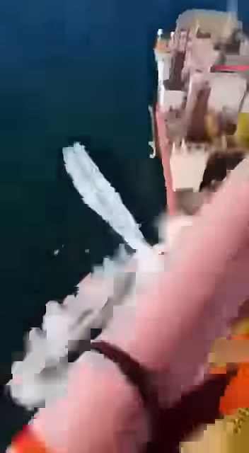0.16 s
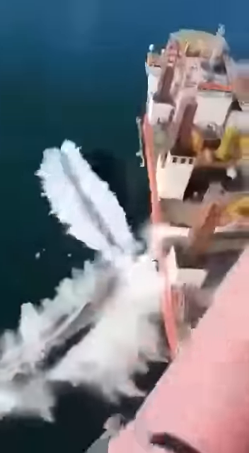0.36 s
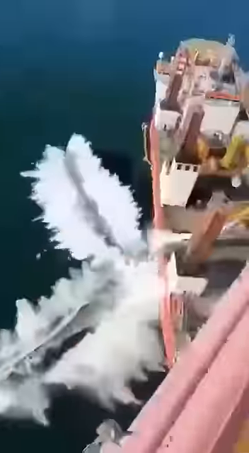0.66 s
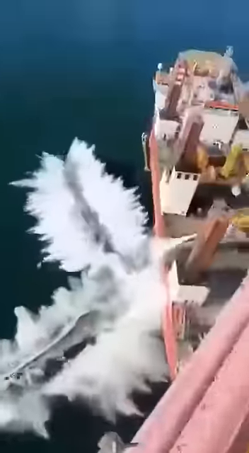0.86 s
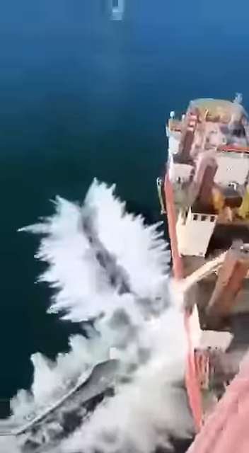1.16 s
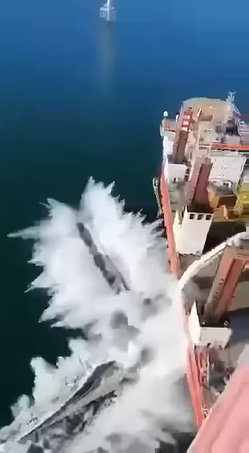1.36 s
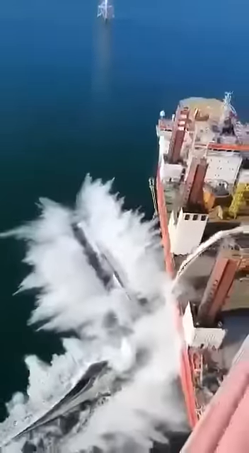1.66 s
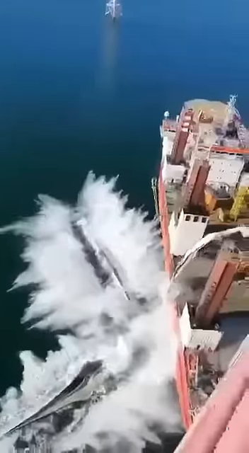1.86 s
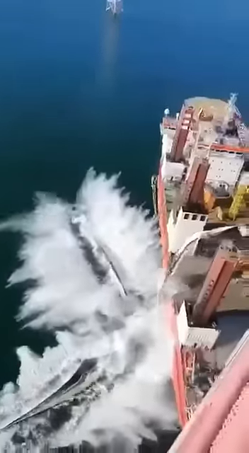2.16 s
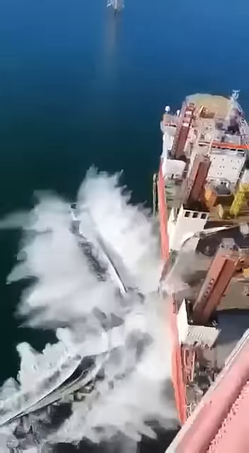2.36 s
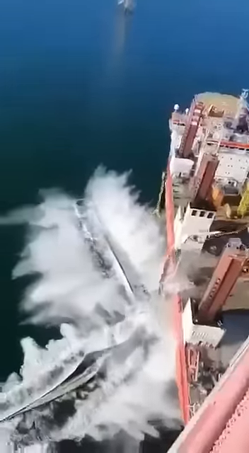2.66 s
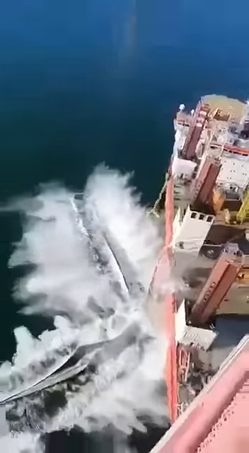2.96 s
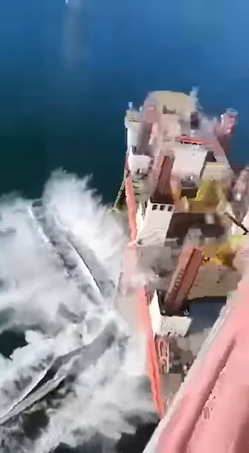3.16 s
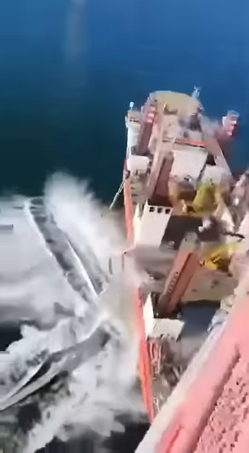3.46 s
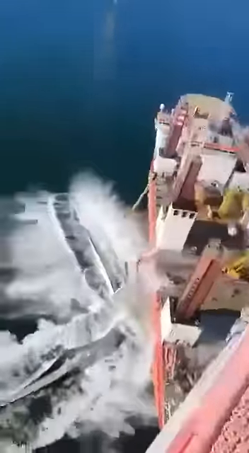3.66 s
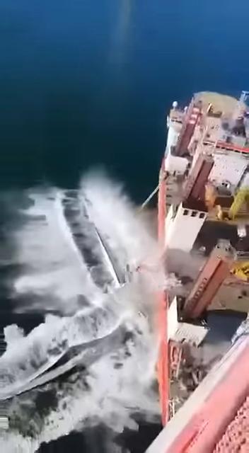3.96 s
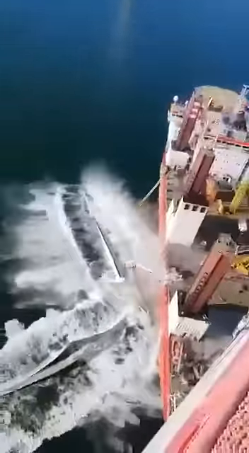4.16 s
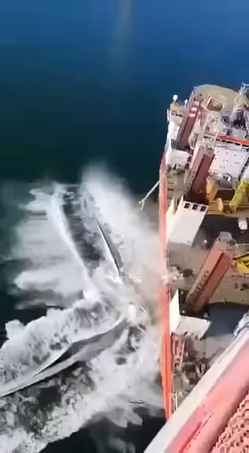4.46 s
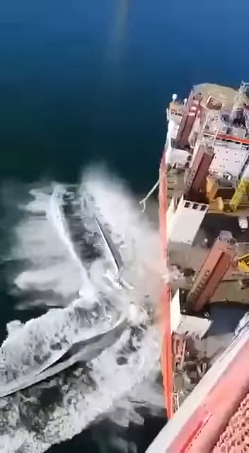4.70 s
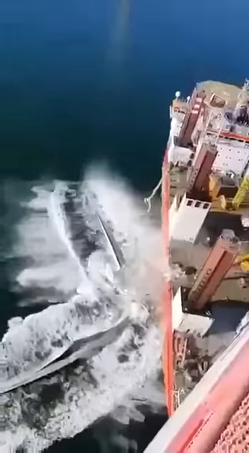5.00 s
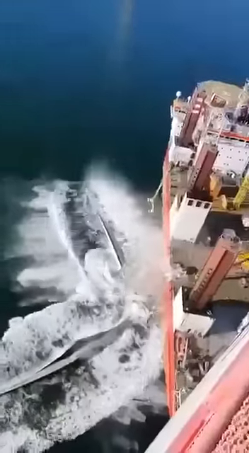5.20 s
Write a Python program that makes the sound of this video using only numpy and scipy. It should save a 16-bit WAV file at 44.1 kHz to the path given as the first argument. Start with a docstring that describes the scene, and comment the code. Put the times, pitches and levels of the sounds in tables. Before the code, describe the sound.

Beside a ship, a huge splash subsides, then falling water swells into a rough, crackling roar while gusts thump the microphone.

```python
"""A rush of thrown water over a low boom fades first: a huge object has crashed into the sea beside a ship.
Heard from a high, windy deck, it swells into a churning roar as the spray comes down,
with crackling drops, thuds and sharp slaps. Gusts buffet the microphone: a rumble, low thumps and a rasp.
Water and wind are coloured noise that follows one curve of force; slaps, thuds, gushes and buffets
are short bursts or swings placed one by one."""
import sys
import numpy as np
from scipy import signal
from scipy.fft import rfft, irfft
from scipy.io import wavfile
from scipy.ndimage import uniform_filter1d, minimum_filter1d

SR = 44100
rng = np.random.default_rng(int(sys.argv[2]) if len(sys.argv) > 2 else 0)


def digitize_waveform(pressure):
    """Quantize a signal to 16-bit integers and store it at the path in sys.argv[1].

    Rows of a 2-D input are taken as channels; values are limited to [-1, 1].
    """
    field = np.atleast_2d(pressure).T
    bounded = np.clip(field, -1, 1)
    quanta = np.round(bounded * 32767).astype(np.int16)
    wavfile.write(sys.argv[1], SR, quanta)


N = 235168
TIME = np.arange(N) / SR


def from_db(db):
    """Decibels to gain."""
    return 10 ** (np.asarray(db) / 20)


def unit(x):
    """Scales to rms 1."""
    return x / np.sqrt(np.mean(x ** 2) + 1e-20)


def at_hz(points, hz):
    """Reads a table on a log-frequency axis."""
    f, value = np.transpose(points)
    return np.interp(np.log(hz + 1), np.log(f + 1), value)


def level(rows):
    """A curve in dB as a gain for every sample."""
    s, db = np.transpose(rows)
    return from_db(np.interp(TIME, s, db))


def add(mix, start_s, sound):
    """Mixes a sound in at its start time."""
    part = mix[:, max(round(start_s * SR), 0):][:, :sound.shape[-1]]
    part += sound[..., :part.shape[-1]]


def noise():
    """Two independent white noises."""
    return rng.standard_normal((2, N))


def grains(per_s, spread_db):
    """Dense random impulses, most small and a few large."""
    size = from_db(spread_db * np.minimum(rng.exponential(1, N), 4))
    struck = rng.random(N) < per_s / SR
    return unit(noise() * size * struck)


def eddies(rate_hz):
    """A random wobble of rms 1, with changes up to about the given rate."""
    hz = np.fft.rfftfreq(N, 1 / SR)
    shape = hz / (hz + 10) / (1 + (hz / rate_hz) ** 2)
    return unit(irfft(rfft(rng.standard_normal(N)) * shape, N))


# Stereo likeness by pitch, bass nearly mono, treble wide and partly opposed in phase:
# pitch_hz, likeness (1 same, 0 unrelated, -1 opposed)
STEREO_LIKENESS = [(80, .995), (400, .99), (600, .98), (1000, .95), (1600, .93), (2050, .95), (2450, .78),
                   (2850, .2), (3300, -.75), (3700, -.7), (4500, -.1), (8000, -.25)]
# Tilt between left and right: pitch_hz, left_over_right_db
STEREO_BALANCE = [(60, 0.26), (300, 0.4), (1500, 0.76), (5000, 0.5)]
# Phase between left and right: pitch_hz, left_lead_rad
STEREO_LEAD = [(100, 0), (400, .04), (1200, .15), (2300, .3), (3000, .7), (4500, .26)]


def colour(pair, spectrum):
    """Gives two noises a spectrum and a stereo image: bass nearly mono, treble wide and partly opposed."""
    hz = np.fft.rfftfreq(N, 1 / SR)
    mid, side = rfft(pair)
    same = np.clip(at_hz(STEREO_LIKENESS, hz), -.995, .995)
    mid = mid * np.sqrt(1 + same)
    side = side * np.sqrt(1 - same)
    # half of the tilt and phase goes to each channel
    offset = from_db(at_hz(STEREO_BALANCE, hz) / 2) * np.exp(.5j * at_hz(STEREO_LEAD, hz))
    stereo = np.array([(mid + side) * offset, (mid - side) / offset])
    return unit(irfft(stereo * from_db(at_hz(spectrum, hz)), N))


def steady(x, span_s):
    """Keeps a noise's grain but evens out its slow swells."""
    power = uniform_filter1d((x ** 2).mean(0), max(int(span_s * SR), 2))
    return x / np.sqrt(abs(power) + 1e-9)


def clumps(x, depth_db, width_hz, span_s):
    """Churning is uneven: patches of the spectrum swell and sink at random."""
    frame, hop = 1024, 256
    z = signal.stft(x, nperseg=frame, noverlap=frame - hop)[2]
    patch = rng.standard_normal(z.shape[1:])
    # smooth across pitch, then across time
    patch = signal.lfilter([1], [1, -np.exp(-SR / frame / width_hz)], patch, axis=0)
    patch = signal.lfilter([1], [1, -np.exp(-hop / SR / span_s)], patch, axis=1)
    uneven = z * from_db(depth_db * unit(patch))
    return signal.istft(uneven, nperseg=frame, noverlap=frame - hop)[1][:, :N]


def burst(t, centre_hz, octaves, apart, top_hz=3400):
    """A stretch of noise around one pitch, different between left and right by the given amount."""
    hz = np.fft.rfftfreq(len(t), 1 / SR)
    band = 1 / (1 + (np.log2((hz + 1) / centre_hz) / octaves) ** 2)
    band = band / (1 + (hz / top_hz) ** 10)
    mid, side = irfft(rfft(rng.standard_normal((2, len(t)))) * band, len(t))
    return steady(np.array([mid + apart * side, mid - apart * side]), span_s=0.0017)


# Force of the turbulence, sinking to a lull, then building as the water comes down: time_s, force_db
FORCE = [(0, -20), (.5, -18.5), (.61, -26.5), (1.1, -29.5), (1.62, -36.5), (2, -36), (2.65, -25),
         (2.87, -21.5), (3.15, -19.5), (3.26, -15.5), (3.7, -16), (3.82, -19.5), (4.1, -18), (4.25, -17),
         (4.62, -16), (4.76, -19.5), (5.2, -14.5), (5.33, -18)]
FULL_DB = -18  # the force at which a layer plays at its own gain_db


def follow(gain_db, slope):
    """A layer's gain: its level at full force, and the dB it moves for each dB of force."""
    return from_db(gain_db) * (level(FORCE) / from_db(FULL_DB)) ** slope


def swells(rows, order):
    """Each event lifts a layer by the dB in one column: attack, hold, release."""
    attack, release = 0.13, 0.78  # shares of the event's length
    lift = np.zeros(N)
    for row in rows:
        age = (TIME - row[0]) / row[1]
        ramps = np.minimum(age / attack, (1 - age) / release)
        lift += row[order] * np.clip(ramps, 0, 1)
    return from_db(lift)


def arrival(growth_db=10, onset_s=1.75, growth_s=1.52):
    """The gain of the layers that harden as the falling water arrives."""
    arrived = np.clip((TIME - onset_s) / growth_s, 0, 1)
    return from_db(growth_db * (arrived - 1))


# Tone of the roar: pitch_hz, level_db (per Hz)
ROAR_TONE = [(60, -18), (110, -19.5), (160, -1.5), (270, -0.5), (400, -1.5), (600, -8.5), (850, -10.5),
             (1200, -18), (1800, -23), (3000, -38), (4500, -101.5)]
# Surges of churning water, shared with rasp and spray: start_s, length_s, roar_db, rasp_db, spray_db (lifts)
CHURN_SURGES = [(.1, 0.45, -2.5, -2, -1), (.403, 0.048, 3, -3, 6), (1.39, 0.024, 3, 1, 0),
                (2.2, 1, -1, -1, 3), (2.7, 0.023, 1.5, 0, 5.5), (2.85, 0.18, 3, 10.5, 4.5),
                (2.96, 0.44, 0, -2, 7), (3.165, 0.09, 3.5, 2.5, 2), (3.48, 0.053, 1.5, 8.5, 0),
                (3.66, 0.12, 0, 6, 1.5), (3.95, 0.14, 4, 4, 4.5), (4.352, 0.082, 1.5, 1, -1.5),
                (4.515, 0.12, 2, 0.5, -4.5), (4.64, 0.081, 4, -2, -3), (4.835, 0.034, 5.5, -1, 6),
                (5.055, 0.092, 2, 1.5, 2), (5.21, 0.065, 2.5, -4, -7)]


def roar(flutter, flutter_db=0.5, gain_db=-18.0, slope=1.0):
    """Countless collapsing pockets of air and water, surging with the turbulence."""
    churn = colour(grains(per_s=5000, spread_db=1.5) * from_db(flutter_db * flutter), ROAR_TONE)
    churn = clumps(churn, depth_db=2.5, width_hz=42, span_s=0.042)
    return follow(gain_db, slope) * swells(CHURN_SURGES, order=2) * steady(churn, span_s=0.035)


def wash():
    """The water thrown out by the impact rushes away over a low boom; both fade steadily."""
    rush = from_db(-33.5 - 10 * TIME) * burst(TIME, centre_hz=746, octaves=0.23, apart=0.1)
    hz = np.fft.rfftfreq(N, 1 / SR)
    boom_band = np.exp(-np.log2((hz + 1) / 160) ** 2 / .5)  # centred on 160 Hz
    boom = unit(irfft(rfft(rng.standard_normal(N)) * boom_band, N))
    return rush + from_db(-24.5 - 12.5 * TIME) * boom  # fades in dB per second


# Slaps, and in the last row a tiny click of overload:
# start_s, level_db (of the crack's envelope peak), pitch_hz, tail_t60_s
SLAP_AND_CLICK_HITS = [(0.44, -19, 1700, .07), (0.968, -25, 1590, 0.052), (1.1348, -19, 1060, 0.083),
                       (2.032, -26, 2000, .04), (2.0408, -17, 2100, 0.11), (2.142, -30, 2900, 0.11),
                       (2.165, -41, 1700, .06), (2.228, -28, 1670, 0.09), (2.5388, -18, 2750, 0.23),
                       (2.742, -13.5, 2110, 0.17), (2.8584, -18, 2060, .04), (2.8766, -12, 2060, 0.1),
                       (2.8882, -15, 1820, 0.093), (2.9433, -7.5, 2200, 0.087), (2.948, -14, 1600, .07),
                       (3.1165, -15, 1590, .1), (3.174, -16, 1500, 0.065), (3.3183, -10, 1620, .05),
                       (3.373, -10, 1930, 0.088), (3.487, -16, 1490, 0.06), (3.571, -12, 2160, 0.18),
                       (3.719, -11, 1500, .05), (3.761, -8, 1500, 0.041), (3.8768, -11, 1520, 0.13),
                       (3.9966, -9, 1540, .04), (4.1287, -17, 1570, 0.037), (4.365, -12.5, 1680, 0.085),
                       (4.843, -13, 1500, .06), (5.002, -8, 1700, .05), (5.065, -15, 1820, 0.092),
                       (5.1351, -20, 1480, 0.054), (5.164, -18, 1580, .04)]


def slaps_and_click(tail_db=-15, body_db=-14, body_hz=950, body_t60_s=0.031):
    """A slap is a crack of two or three cycles, a dull smack and a short scatter; so is the last click."""
    out, t = np.zeros((2, N)), np.arange(SR // 4) / SR
    age = t / .00055  # the crack peaks about half a millisecond in
    for start_s, level_db, pitch_hz, t60_s in SLAP_AND_CLICK_HITS:
        crack = age ** 2 * np.exp(2 * (1 - age)) * np.sin(2 * np.pi * pitch_hz * t)
        tail = from_db(tail_db - 60 * t / t60_s) * burst(t, pitch_hz, octaves=0.66, apart=0.16)
        smack = from_db(body_db - 60 * t / body_t60_s) * burst(t, body_hz, octaves=0.45, apart=0.49)
        onset = 1 - np.exp(-age)
        add(out, start_s, from_db(level_db) * (crack + onset * (tail + smack)))
    return out


# Slabs of water landing flat: start_s, level_db (of the envelope peak), pitch_hz
THUD_HITS = [(0.419, -21, 615), (0.429, -7, 520), (0.439, -11, 535), (1.094, -19.5, 610),
             (1.402, -18.5, 380), (1.472, -39, 560), (1.933, -42, 600), (2.541, -19.5, 537),
             (3.76, -14, 595), (3.862, -5.5, 470), (3.976, -9.5, 480), (4.362, -2, 468), (4.526, -3, 720),
             (4.603, -7.5, 490)]


def thuds(rise_s=0.0016, scatter=0.076):
    """A slab of water lands flat: a few quick, ragged swings of pressure."""
    out, t = np.zeros((2, N)), np.arange(SR // 16) / SR
    for start_s, level_db, pitch_hz in THUD_HITS:
        swing = np.sin(2 * np.pi * pitch_hz * t)
        ragged = swing + scatter * burst(t, 2 * pitch_hz, octaves=0.13, apart=0.37)
        envelope = t / rise_s * np.exp(1 - t / rise_s)
        add(out, start_s, from_db(level_db) * envelope * ragged)
    return out


# Gushes of falling water: start_s, level_db (before gain_db), pitch_hz, length_s (decay scale)
GUSH_HITS = [(0.405, -18, 700, 0.049), (0.923, -29, 810, 0.06), (1.246, -33, 710, 0.072),
             (2.865, -19.5, 965, 0.17), (3.417, -23.5, 760, 0.27), (3.862, -9, 547, 0.032),
             (3.985, -17, 412, 0.12), (4.362, -9, 510, 0.037), (4.464, -16, 590, 0.055),
             (4.523, -11, 505, 0.029), (4.6, -14.5, 666, 0.067), (4.853, -17, 495, 0.034),
             (5.145, -13.5, 885, 0.037)]


def gushes(gain_db=-3, rise=0.18):
    """Sheets of water land: a quick swell of low noise that sinks away."""
    out, t = np.zeros((2, N)), np.arange(SR // 2) / SR
    for start_s, level_db, pitch_hz, length_s in GUSH_HITS:
        age = t / length_s
        swell = (1 - np.exp(-age / rise)) * np.exp(-age ** 2)
        sheet = burst(t, pitch_hz, octaves=0.33, apart=0.087)
        add(out, start_s, from_db(gain_db + level_db) * swell * sheet)
    return out


# Crackle of heavy drops: pitch_hz, level_db (per Hz)
SPATTER_TONE = [(600, -9), (1100, 9), (1600, -1), (1900, 3.5), (2300, 6.5), (3200, -28), (3800, -27.5),
                (5000, -33), (8000, -59.5)]


def spatter(gain_db=-32, slope=0.74):
    """Heavy drops crack on the surface, a few hundred a second, in uneven patches of colour."""
    hits = colour(grains(per_s=330, spread_db=1.2), SPATTER_TONE)
    hits = clumps(hits, depth_db=6, width_hz=370, span_s=.008)
    return follow(gain_db, slope) * arrival() * steady(hits, span_s=.04)


# Main curtain of spray: pitch_hz, level_db (per Hz)
PATTER_TONE = [(1200, -30), (2400, -7.5), (3200, 8), (3900, -28.5), (5500, -26.5), (7500, -26.5),
               (9200, -16.5), (11000, -37.5)]
# Open sea: pitch_hz, level_db (per Hz)
SEA_TONE = [(1200, -7.5), (2200, 2.5), (3400, -4), (4500, -8), (6000, -15.5), (7500, -22), (11000, -23.5)]


def patter(loudest_db=-33, loudest_s=3.43, rise_s=0.44, fall_s=0.044, sea_db=-56):
    """The curtain of spray comes down and thins out, over the faint hiss of the sea."""
    age = TIME - loudest_s
    fall = from_db(loudest_db) * np.exp(np.minimum(age / rise_s, -age / fall_s))
    drops = colour(grains(per_s=14000, spread_db=5.5), PATTER_TONE)
    return fall * drops + from_db(sea_db) * colour(noise(), SEA_TONE)


# Fans of fine mist: loudest_s, half_length_s, level_db
MIST_FANS = [(0.254, 0.21, -42), (5.076, 0.03, -35.5), (5.134, 0.077, -36)]
# Their hiss: pitch_hz, level_db (per Hz)
MIST_TONE = [(2500, -33), (4200, 11), (5300, -16.5), (6300, -15), (8000, -17.5), (11000, -22.5)]


def mist():
    """Fans of fine droplets fly up with a short, bright fizz."""
    swell = np.zeros(N)
    for loudest_s, half_length_s, level_db in MIST_FANS:
        swell += from_db(level_db) * np.exp(-((TIME - loudest_s) / half_length_s) ** 2)
    return swell * colour(grains(per_s=4000, spread_db=2.5), MIST_TONE)


# Fine far spray: pitch_hz, level_db (per Hz)
SPRAY_TONE = [(1000, -12), (2500, 4.5), (3300, 16), (3900, 6.5), (5000, 7.5), (6200, -2), (7700, -17.5),
              (9000, -18), (11000, -40)]


def spray(flutter, flutter_db=2.03, gain_db=-40, slope=0.91):
    """Far droplets rain back on the sea as a fine hiss that drifts on the wind."""
    drops = colour(grains(per_s=12000, spread_db=1.5) * from_db(flutter_db * flutter), SPRAY_TONE)
    drops = clumps(drops, depth_db=3.2, width_hz=200, span_s=.02)
    return follow(gain_db, slope) * swells(CHURN_SURGES, order=4) * steady(drops, span_s=0.73)


# Wind rasp: pitch_hz, level_db (per Hz)
RASP_TONE = [(500, -16), (900, -5.5), (1300, -2.5), (1620, 3.5), (1900, -12.5), (2350, -0.5), (2750, -8),
             (3200, -14), (3700, -43.5), (4500, -56), (8000, -78)]


def rasp(gain_db=-26, slope=0.8):
    """Small eddies tear at the microphone ports and ring them broadly."""
    tearing = colour(grains(per_s=3000, spread_db=1.0), RASP_TONE)
    tearing = clumps(tearing, depth_db=5.5, width_hz=110, span_s=0.02)
    tearing = steady(tearing, span_s=.025)
    return follow(gain_db, slope) * arrival() * swells(CHURN_SURGES, order=3) * tearing


# Hollow resonance of the ports: pitch_hz, level_db (per Hz)
HOLLOW_TONE = [(900, -5.5), (1270, -4), (1540, 13.5), (1720, 7), (1900, 5.5), (2250, 4), (2700, -54)]


def hollow(flutter, flutter_db=2, gain_db=-36, slope=1.6):
    """Wind drives one broad resonance of the ports, most of all in a squall blowing straight in."""
    rush = colour(noise() * from_db(flutter_db * flutter), HOLLOW_TONE)
    squall_s, half_length_s, lift_db = 5.076, 0.23, 14
    squall = from_db(lift_db * np.exp(-((TIME - squall_s) / half_length_s) ** 2))
    return follow(gain_db, slope) * squall * steady(rush, span_s=.03)


# Buffets: start_s, level_db (before gain_db), pitch_hz (before wander), length_s
BUFFET_HITS = [(0.404, -9.5, 249, 0.053), (0.417, -11, 87, 0.06), (2.712, -13, 228, 0.018),
               (2.938, -9, 346, 0.028), (3.175, -7.5, 241.5, 0.057), (3.289, -4.5, 91.6, 0.045),
               (5.041, -4.5, 76.6, 0.034), (5.221, -19, 262, 0.012)]


def buffets(gain_db=-2, wander=0.25):
    """Single strong eddies: a few uneven swings of pressure each."""
    out = np.zeros((2, N))
    for start_s, level_db, pitch_hz, length_s in BUFFET_HITS:
        hz = pitch_hz * (1 + wander * eddies(pitch_hz)[:int(length_s * SR)])
        swing = np.sin(2 * np.pi * (np.cumsum(hz) / SR + rng.random()))
        envelope = signal.windows.tukey(len(hz), .7)
        add(out, start_s, from_db(gain_db + level_db) * swing * envelope)
    return out


# Wind rumble: pitch_hz, level_db (per Hz)
RUMBLE_TONE = [(20, -17), (35, -10.5), (55, 3), (85, 8.5), (115, 2.5), (170, 0), (400, -62.5)]
# Gusts pressing on the microphone: start_s, length_s, lift_db
WIND_GUSTS = [(.42, 0.21, 11), (.55, 0.62, 4), (1.12, 0.14, 6), (2.1, 0.88, 5), (2.86, 0.059, 8),
              (3.27, 0.17, 4.5), (3.37, 0.051, 6.5), (4.34, 0.061, 11), (4.52, 0.035, 5),
              (5.025, 0.076, 13), (5.26, 0.07, 6)]


def rumble(gain_db=-24, slope=0.8):
    """Large eddies press on the microphone as a low, nearly mono rumble."""
    pressure = follow(gain_db, slope) * swells(WIND_GUSTS, order=2)
    return pressure * steady(colour(noise(), RUMBLE_TONE), span_s=0.21)


# Added stereo width: wash from all around, loud roar from ahead, falling spray from both sides.
# Columns: time_s, midrange_db, crackle_db, hiss_db
STEREO_WIDTH = [(0, 11, 0, -3), (.45, 12, 2, -1), (.8, 11.5, -1, -3), (2.4, 10.5, -1, -3),
                (3.0, 11.5, -1, -2), (3.2, 6, -2, 0), (3.37, 0, 1, 7), (3.6, -1, 0, 5), (3.85, -2, -1, -1),
                (4.5, 1, 2, -1), (4.9, 1, 2, -1), (5.13, 4, 6, -3), (5.33, 7, 2, -2)]


def widen(pair, order, low_hz, high_hz):
    """Opens and narrows the stereo image of one band, by one column of the width table."""
    mid, side = (pair[0] + pair[1]) / 2, (pair[0] - pair[1]) / 2
    band_pass = signal.butter(2, [low_hz, high_hz], "band", fs=SR, output="sos")
    band = signal.sosfiltfilt(band_pass, side)
    side = side - band + band * level(np.array(STEREO_WIDTH)[:, [0, order]])
    return np.array([mid + side, mid - side])


def lean(pair, turn_s=3.1, length_s=0.26, left_over_right_db=0.4):
    """The whole sound shifts a little to the left as the microphone turns."""
    turn = np.clip((TIME - turn_s) / length_s, 0, 1)
    return pair * from_db(np.array([[.5], [-.5]]) * left_over_right_db * turn)


def scene():
    """One turbulent flutter shakes the roar, the hollow of the ports and the spray together."""
    flutter = eddies(rate_hz=30)
    rush = roar(flutter) + wash() + gushes() + rasp() + hollow(flutter) + spatter()
    water = widen(rush, order=1, low_hz=620, high_hz=2000)
    water = water + spray(flutter) + mist() + slaps_and_click() + thuds() + patter()
    water = widen(water, order=2, low_hz=2100, high_hz=3700)
    water = widen(water, order=3, low_hz=3800, high_hz=6500)
    return lean(water + rumble() + buffets())


def record(dry):
    """A fast limiter holds the peaks down; then soft ends and the band limit."""
    room = np.minimum(1, .96 / (abs(dry).max(0) + 1e-9))
    gain = uniform_filter1d(minimum_filter1d(room, size=120), size=120)
    ends = np.minimum(1, np.minimum(TIME, TIME[::-1]) / .002)  # 2 ms fades
    low_pass = signal.firwin(511, 11300, window=("kaiser", 9), fs=SR)  # cutoff in Hz
    return signal.oaconvolve(dry * gain * ends, low_pass[None], "same")


dry = scene()
out = record(dry)
digitize_waveform(out)
```